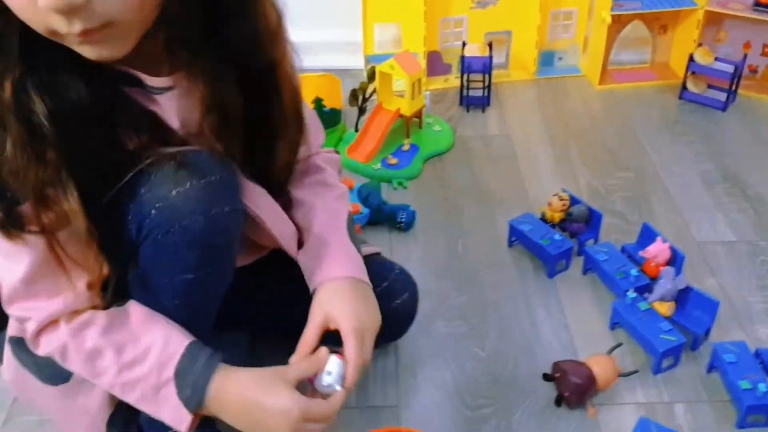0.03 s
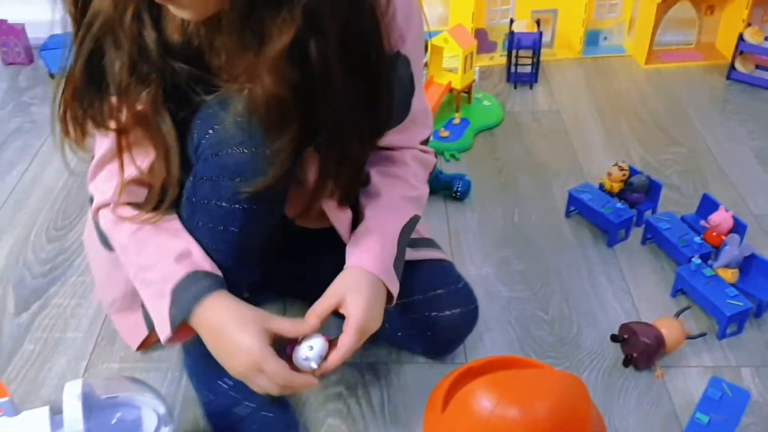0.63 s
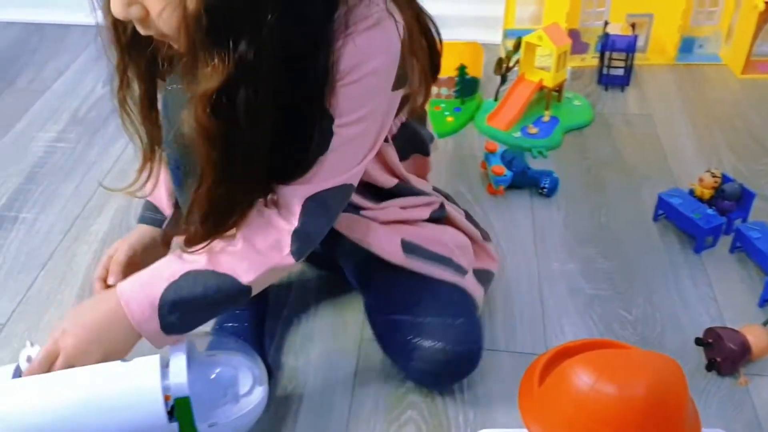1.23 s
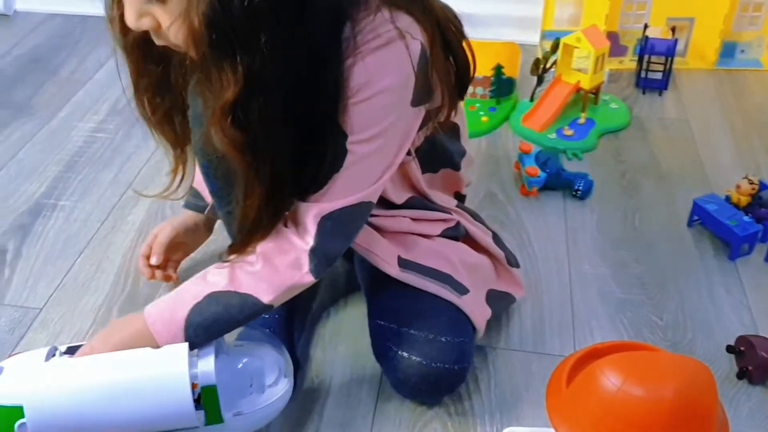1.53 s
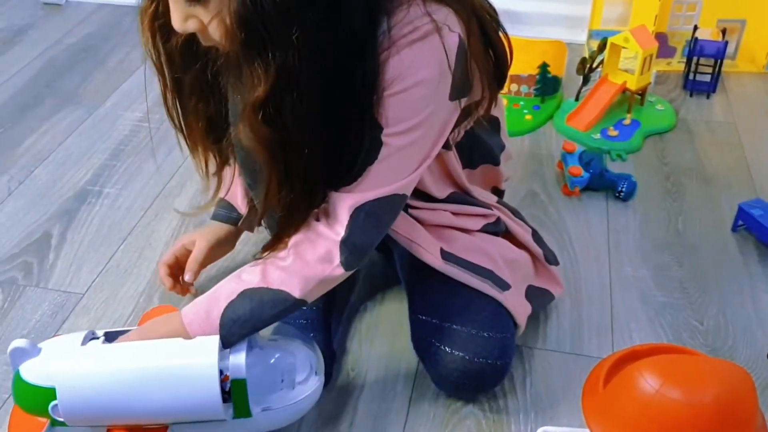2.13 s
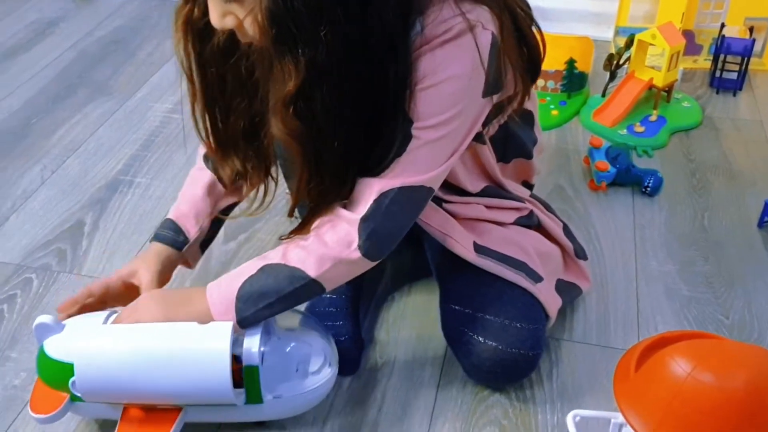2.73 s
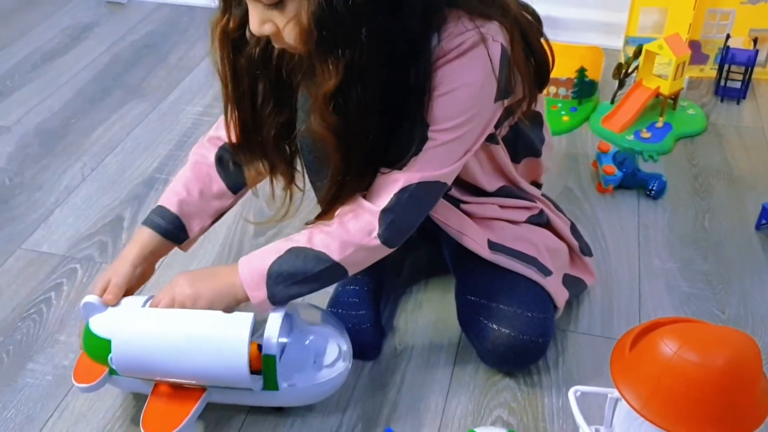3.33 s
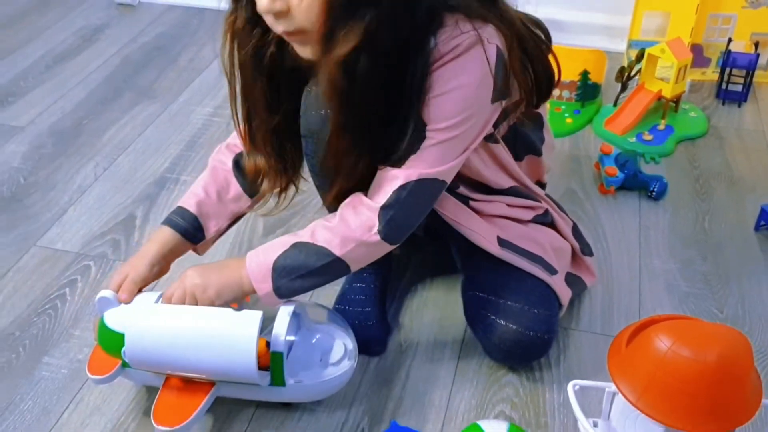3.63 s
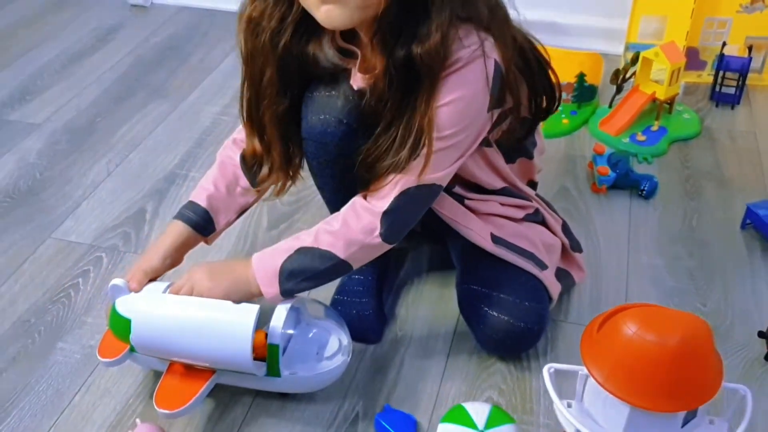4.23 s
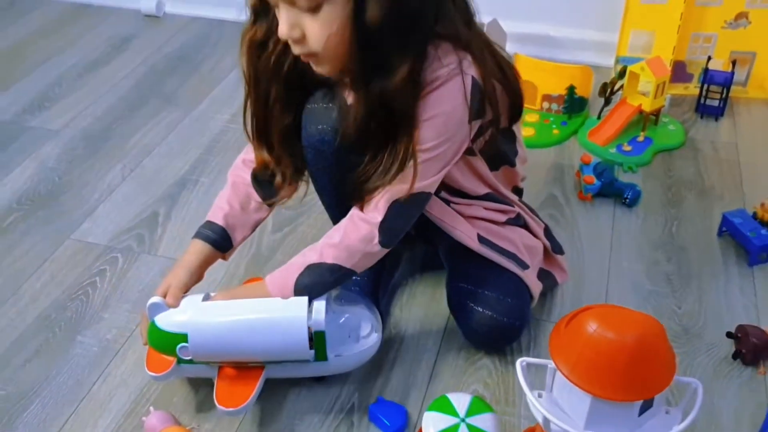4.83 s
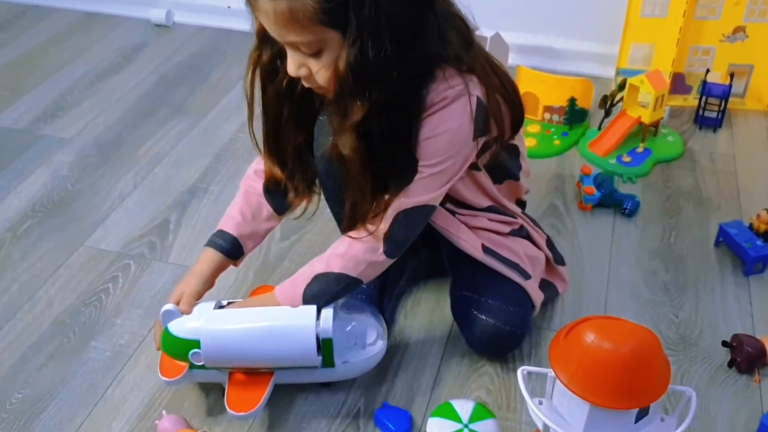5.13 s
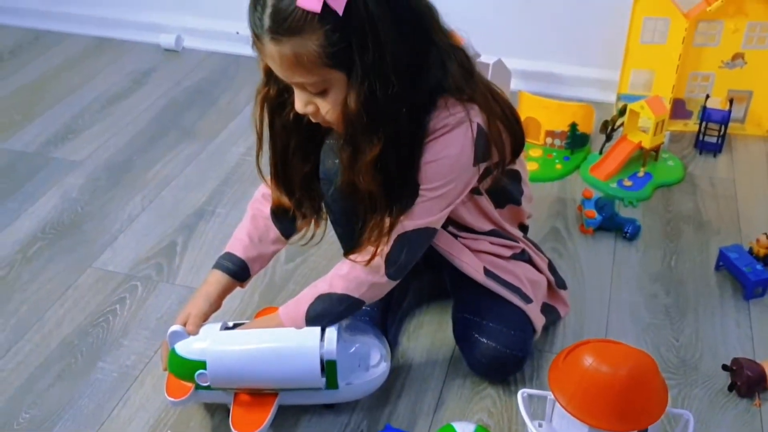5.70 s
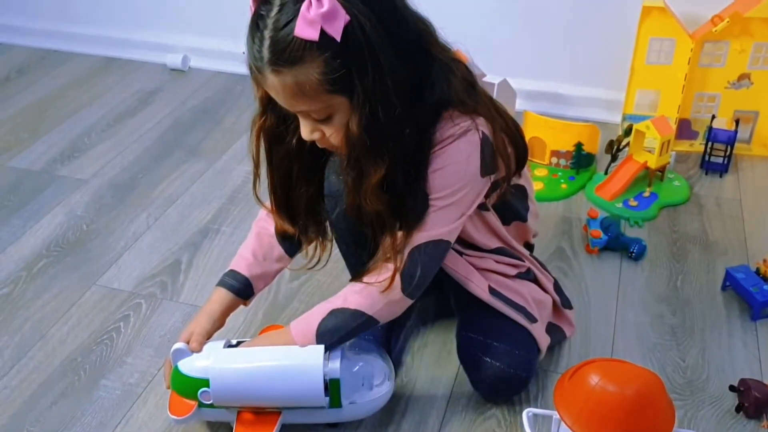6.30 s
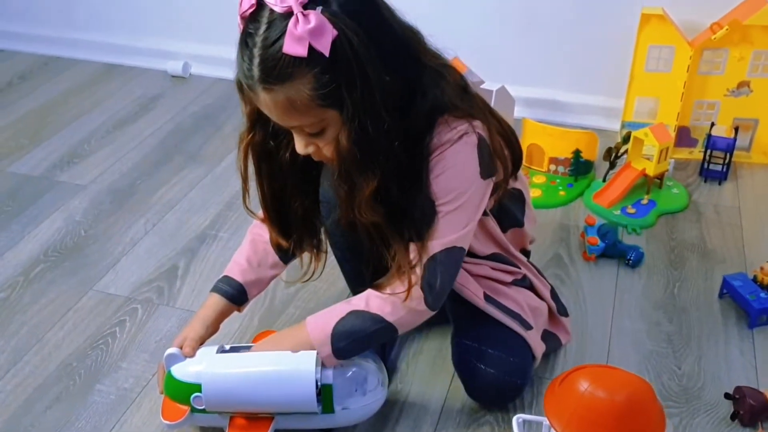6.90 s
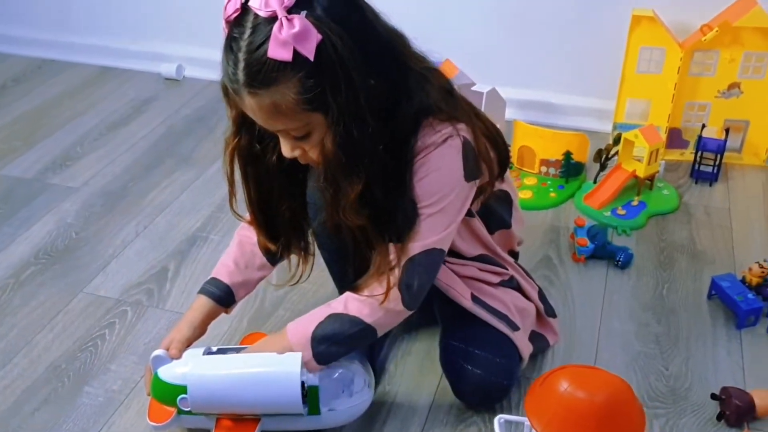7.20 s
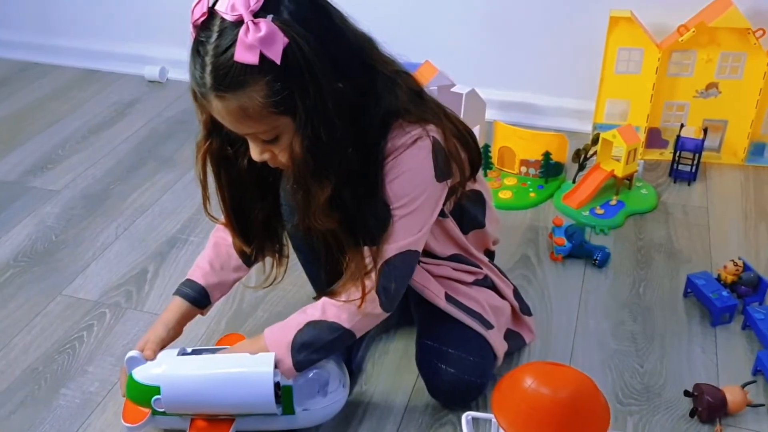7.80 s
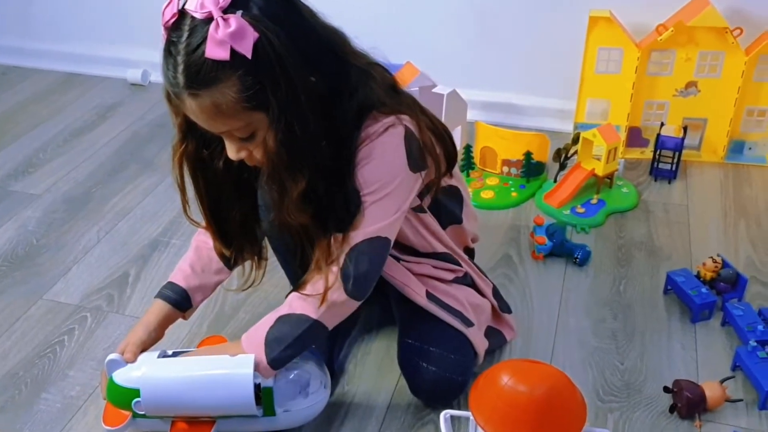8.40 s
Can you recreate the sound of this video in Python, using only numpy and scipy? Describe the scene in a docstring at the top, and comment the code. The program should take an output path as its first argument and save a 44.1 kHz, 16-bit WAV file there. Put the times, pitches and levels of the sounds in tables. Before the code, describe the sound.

Faint clothing rustle opens in a quiet room, with a soft knock and scuff just before 1 second. At about 1.4 seconds a small plastic figure clacks several times against a hollow toy plane, and loose parts rattle at 1.7 and 2.1. From 2.3 to 4 seconds there are light taps, soft scrapes on the hard floor and very faint squeaks, then two dull low bumps. The loudest moment is a quick, sharp plastic clatter at 4.5 seconds, followed by a brief slide, a catch snapping at 4.8 and a strong rattling knock at 5.1. Single lighter taps follow. Parts click together again around 6.6 seconds, and small irregular clicks continue from 7.4 until the end at about 8.3. The toy sounds near and slightly left, with a short room echo over faint low background noise.

```python
"""A hard-floored playroom, where a child fits a small plastic figure into a hollow toy aeroplane.
The figure knocks on the hull, loose parts chatter and knock home, and a catch snaps: each impact
excites damped modes, and the room reverberates. The toy slides after each burst of blows, edges rasp
and joints squeak by stick-slip friction, and the floorboards boom. Clothes swish and rustle over dull
bumps, still air and a low hum that sinks to a faint trace early on."""
import sys
import numpy as np
from scipy import signal
from scipy.fft import rfft, irfft, next_fast_len
from scipy.io import wavfile

SR = 44100
rng = np.random.default_rng(int(sys.argv[2]) if len(sys.argv) > 2 else 0)


def inscribe(sig):
    """Save sig as 16-bit PCM at rate SR to the path in sys.argv[1].

    A 1-D sig is mono; a 2-D sig holds one channel per row.
    Samples are clipped to [-1, 1] before scaling.
    """
    pcm = np.round(np.clip(np.atleast_2d(sig).T, -1, 1) * 32767)
    wavfile.write(sys.argv[1], SR, pcm.astype(np.int16))


N = 372689
MIDDLING_DB = -40   # table level of a blow of middling strength

# figure against the hull: (time [s], relative level [dB], brightness [dB])
FIGURE_KNOCKS = [(0.851, -50.5, -16), (1.326, -35.5, -5.5), (1.362, -33.5, -12), (1.381, -26, -5),
                 (1.428, -27.5, -6.5), (2.509, -54.5, -7), (3.073, -56, -7.5), (3.347, -50.5, -10.5),
                 (3.471, -43, -4.5), (4.464, -26.5, -5), (4.473, -17, -5.5), (4.48, -18.5, -1.5),
                 (4.491, -23, -3.5), (4.522, -20, -2.5), (4.68, -44, -6), (4.772, -38.5, -6),
                 (4.928, -41.5, -7.5), (5.519, -38, -11.5), (6.068, -55.5, -13), (6.172, -43.5, -14.5),
                 (6.179, -42.5, -12)]
# loose parts knocking home: (time [s], relative level [dB], brightness [dB], chatter beforehand [s])
PART_KNOCKS = [(1.7164, -44.5, -2, 0), (1.724, -32.5, -8, 0.0049), (1.736, -34.5, -11.5, 0),
               (1.77, -39, -16, 0), (2.073, -38.5, -13, 0.059), (5.118, -23, -8, 0.085),
               (5.156, -27.5, -10, 0), (6.542, -35.5, -11.5, 0.051), (6.664, -37.5, -13, 0.0055),
               (6.706, -32.5, -10, 0), (6.823, -53, -7, 0.012), (7.094, -45, -20, 0), (7.457, -48, 0, 0),
               (7.487, -38.5, -8, 0), (7.6, -42.5, -8.5, 0.0011), (7.659, -55, 7.5, 0),
               (7.835, -45, -16.5, 0.0014), (7.907, -48, -10.5, 0.00053), (7.965, -48, -16, 0),
               (8.251, -47.5, -17, 0.039), (8.292, -47, -14.5, 0)]
# modes of the hollow hull: (frequency [Hz], relative level [dB], t60 [s])
HULL_MODES = [(402.6, -5.5, 0.07), (473, -9, 0.15), (599, 1, 0.05), (795, 1, 0.062), (866, 2, 0.041),
              (1048, 1, 0.051), (1195, -6, 0.085), (1353, 4.5, 0.055), (1440, -9.5, 0.0401),
              (2014, 4, 0.027), (2205, -2.5, 0.031), (2600, -3, .02), (3922, -9.5, 0.019),
              (5400, -12.5, 0.013), (6870, -14, 0.038)]


def figure_knocks(spots):
    """Impact excitation: the figure strikes the hull, which rings in its normal modes."""
    return blows(FIGURE_KNOCKS, HULL_MODES, spots,
                 body_db=-1, crack_db=9.5, crack_t60=.03, top_hz=18500, gain_db=-5.5)


def loose_parts(spots):
    """Clearance rattle: a part with play in its seat touches lightly twice before it knocks home."""
    # modes of a loose part: (frequency [Hz], relative level [dB], t60 [s])
    part_modes = [(948, 2, 0.058), (1700, -12, 0.038), (1925, -0.5, 0.049), (2784, 0.5, 0.051),
                  (2750, 2, 0.053), (2886, -4, 0.035)]
    contacts = [row[:3] for row in PART_KNOCKS]
    for s, db, bright_db, chatter_s in PART_KNOCKS:
        if chatter_s > 0:
            touch_db = -54.5 + .66 * (db - MIDDLING_DB)
            contacts.append((s - chatter_s, touch_db, bright_db - 1))
            contacts.append((s - .52 * chatter_s, touch_db + 4, bright_db - 1))
    return blows(contacts, HULL_MODES + part_modes, spots,
                 body_db=-2, crack_db=12.5, crack_t60=.015, top_hz=17500, gain_db=-6.5)


def catch_snap(spots):
    """Impulse response: a catch snaps home, exciting its own modes and those of the hull."""
    # the snap: (time [s], relative level [dB], brightness [dB])
    snaps = [(4.798, -34, -1.5)]
    # modes of the catch: (frequency [Hz], relative level [dB], t60 [s])
    catch_modes = [(1922, 14, 0.027), (3750, 0.5, 0.031), (6100, 0, 0.011), (6900, -4, 0.031)]
    return blows(snaps, HULL_MODES + catch_modes, spots,
                 body_db=-6.5, crack_db=15, crack_t60=.034, top_hz=18000, gain_db=-.5)


def blows(contacts, modes, spots, body_db, crack_db, crack_t60, top_hz, gain_db):
    """Modal superposition: each contact is a noisy crack plus a sum of damped sinusoids."""
    # spectrum of the contact itself: (frequency [Hz], relative density [dB])
    crack_spectrum = [(150, -23), (280, -11), (400, 1.5), (900, 4), (2200, 6.5), (3300, -10.5), (6000, -13),
                      (10000, -24.5), (13000, -18), (15500, -35.5)]
    out, t = np.zeros((2, N + SR)), np.arange(SR // 8) / SR
    hz, mode_db, t60 = np.array(modes, float).T[:, :, None]
    attack = t < .011
    for k, (s, level_db, bright_db) in enumerate(contacts):
        strength = from_db(mode_db + 2 * rng.standard_normal(hz.shape)) * rng.choice([-1, 1], hz.shape)
        grip = 1 + .02 * rng.standard_normal(hz.shape)   # the fingers detune the shell a little
        ring = np.sum(strength * from_db(-60 * t / t60) * np.sin(2 * np.pi * hz * grip * t), axis=0)
        crack_noise = coloured(rng.standard_normal(len(t)), crack_spectrum)
        hit = ring + from_db(crack_db - 60 * t / crack_t60) * crack_noise
        # a lighter touch is duller and hollower
        reach_hz = max(top_hz * from_db(.11 * level_db), 5000)
        hollow_db = body_db - .3176 * (level_db - MIDDLING_DB)
        zones = [band(hit, *edges, order=3) for edges in [(350, 900), (900, 3300), (3300, reach_hz)]]
        hit = sum(from_db(zone_db) * zone / np.std(zone[attack])
                  for zone, zone_db in zip(zones, (hollow_db, 0, bright_db)))
        hit, lead = grazed(hit, graze_db=-19, lead_s=.003)
        sound = heard_from(hit, spots[k % len(spots)])
        start = round(s * SR) - lead
        out[:, start:start + sound.shape[1]] += from_db(gain_db + level_db) * sound
    return out[:, :N]


def grazed(hit, graze_db, lead_s):
    """Double contact: an edge grazes just before the blow; gives the sound and its lead in samples."""
    lead = int(lead_s * rng.uniform(.32, 1.5) * SR) + 1
    graze = from_db(graze_db + 1.2 * rng.standard_normal()) * np.pad(hit, (0, lead))
    return graze + np.pad(hit, (lead, 0)), lead


def scuffs():
    """Sliding friction: toy and knees rub over the floor, and the toy slides on after each burst."""
    # strokes on the floor: (centre time [s], duration [s], relative level [dB])
    strokes = [(.88, 0.045, -47), (2.35, 0.3, -54.5), (2.78, 0.15, -49), (3.06, 0.095, -50),
               (3.355, 0.15, -48.5), (4.0, 0.67, -59.5), (4.72, 0.48, -48)]
    # floor friction: (frequency [Hz], relative density [dB])
    spectrum = [(150, -5.5), (300, -4), (450, 5.5), (650, -3.5), (1300, -1.5), (2200, -12.5), (3300, -26.5),
                (7000, -30), (14000, -41)]
    pause_s, delay_s, slide_s = .15, .16, .33   # a gap longer than pause_s ends a burst
    knocks = sorted(FIGURE_KNOCKS + PART_KNOCKS)
    gaps = np.diff([row[0] for row in knocks], append=np.inf)
    slides = [(s + delay_s, slide_s, -63 + .4 * (db - MIDDLING_DB))
              for (s, db, *_), gap_s in zip(knocks, gaps) if gap_s > pause_s]
    return from_db(-11) * rubbing(strokes + slides, spectrum, slips_per_s=380, spread_db=6.5, hiss=.37)


def rasps():
    """Dry friction: hard edges catch and slip as they pass each other."""
    # strokes of edge on edge: (centre time [s], duration [s], relative level [dB])
    strokes = [(3.49, 0.047, -56), (4.87, 0.023, -62), (5.08, 0.034, -49.5), (7.68, 0.087, -56),
               (7.88, 0.093, -62)]
    # edge friction: (frequency [Hz], relative density [dB])
    spectrum = [(400, -7), (1000, -23), (1800, 5), (3000, -3), (5500, -1), (8000, -11), (14000, -21)]
    return from_db(-6) * rubbing(strokes, spectrum, slips_per_s=390, spread_db=3, hiss=.29)


def rubbing(strokes, spectrum, slips_per_s, spread_db, hiss):
    """Stick-slip motion: plastic advances in tiny uneven jerks, a random impulse train over noise."""
    sizes = from_db(spread_db * np.minimum(rng.exponential(1, N), 4)) * rng.choice([-1, 1], N)
    slips = rms_one(sizes * (rng.random(N) < slips_per_s / SR))
    return swells(strokes) * coloured(slips + hiss * rng.standard_normal(N), spectrum)


def squeaks(width_hz):
    """Friction-induced vibration: joints squeak and the figure groans in narrow, unsteady bands."""
    # sticking contacts: (centre time [s], duration [s], relative level [dB], frequency [Hz])
    strokes = [(2.29, .17, -57.5, 600), (2.782, 0.063, -72.5, 3570), (3.38, 0.12, -73.5, 3580),
               (4.05, .25, -65, 480), (5.482, 0.016, -54.5, 6400)]
    out = np.zeros(N)
    for s, length, db, hz in strokes:
        tone = rms_one(band(rng.standard_normal(N), hz - width_hz / 2, hz + width_hz / 2))
        out += swells([(s, length, db)]) * tone
    return from_db(-3.5) * out


def floorboards():
    """Structure-borne sound: a landing knee and the figure's knocks excite the modes of the boards."""
    # modes of the boards: (frequency [Hz], relative level [dB], t60 [s])
    modes = [(176, -5.5, 0.13), (217, -3.5, 0.071), (265, -1.5, 0.064), (340, -2, 0.091), (586, -4, .07)]
    knee = (.849, -53)   # (time [s], relative level [dB])
    out, t = np.zeros(N), np.arange(SR // 5) / SR
    for s, level_db in [knee] + [(s, db - 27.5) for s, db, _ in FIGURE_KNOCKS]:
        boom = sum(from_db(db - 60 * t / t60) * np.sin(2 * np.pi * hz * t) * rng.choice([-1, 1])
                   for hz, db, t60 in modes)
        start = round(s * SR)
        out[start:start + len(t)] += from_db(level_db) * boom
    return out


def swishes():
    """Fibre friction: brushing sleeves and hair radiate short swells of treble noise."""
    # brushing strokes: (centre time [s], duration [s], level [dB])
    strokes = [(.28, 0.35, -73.5), (.78, 0.24, -65.5), (1.22, 0.17, -67), (2.47, 0.14, -74),
               (2.76, .2, -71.5), (3.3, 0.6, -78), (4.15, .7, -76), (6.06, 0.15, -69)]
    # brushing fibres: (frequency [Hz], relative density [dB])
    spectrum = [(1000, -33.5), (3000, -7), (4500, -4), (7000, 5.5), (8500, -5.5), (11000, 1.5),
                (15000, -12)]
    return swells(strokes) * coloured(diffuse(N), spectrum)


def rustle():
    """Cloth friction: sliding folds make midrange noise that follows the child's movement."""
    # envelope of the rustle: (time [s], level [dB])
    levels = [(0, -65), (0.801, -59), (1.7, -72.5), (3.2, -64), (3.6, -62), (4.3, -64), (5.4, -63),
              (6.42, -74), (6.95, -69), (8.45, -70.5)]
    # sliding cloth: (frequency [Hz], relative density [dB])
    spectrum = [(200, -16), (350, -10), (600, -1.5), (820, 2.5), (1050, -2.5), (1600, -20.5), (3000, -32.5),
                (8000, -43)]
    return envelope(levels) * coloured(diffuse(N), spectrum)


def bumps():
    """Amplitude modulation: brief swells of bass noise are heard as dull bumps."""
    # bumps: (centre time [s], duration [s], relative level [dB])
    strokes = [(4.135, 0.05, -46), (4.24, 0.1, -50), (4.95, 1, -61), (7.2, 0.21, -58.5),
               (7.97, 0.089, -62.5)]
    # bass noise: (frequency [Hz], relative density [dB])
    spectrum = [(18, -9), (39, -5.5), (60, -8), (120, -14), (250, -32.5), (600, -68)]
    return swells(strokes) * coloured(diffuse(N), spectrum)


def hum(hz, waver):
    """Beating: a low tone wavers as it interferes with a narrow band of noise around it."""
    # envelope of the hum: (time [s], relative level [dB])
    levels = [(0, -57), (.4, -68), (1.1, -68), (2.2, -53), (2.4, -72)]
    tone = np.sqrt(2) * np.sin(2 * np.pi * hz * np.arange(N) / SR)
    unsteady = rms_one(band(rng.standard_normal(N), hz - 4, hz + 4))
    return envelope(levels) * (tone + waver * unsteady)


def room_air(level_db):
    """Ambient noise: still air carries a steady, diffuse background, strongest in the bass."""
    # room air: (frequency [Hz], relative density [dB])
    spectrum = [(18, -22), (45, -0.5), (80, -9), (130, 0), (180, -7), (230, 1), (320, -21), (600, -16),
                (900, -8), (1500, -19), (3000, -34.5), (5500, -38.5), (7100, -36.5), (8500, -44),
                (14000, -32)]
    return from_db(level_db) * coloured(diffuse(N), spectrum)


def room_paths(wet_db, build_s, echo_db, wet_left_db, direct_left_db, lag_s):
    """Room impulse response: direct sound from the left, early echoes, a tail whose treble dies first."""
    # reverberation time: (frequency [Hz], t60 [s])
    decay_times = [(200, 0.55), (600, 0.44), (1500, 0.35), (4000, 0.33), (8000, 0.31), (14000, .27)]
    t = np.arange(SR * 3 // 5) / SR
    edges, tail = np.geomspace(100, 18000, 12), 0
    noises = diffuse(len(t)), diffuse(len(t))
    for k, (low, high) in enumerate(zip(edges, edges[1:])):
        t60 = at_hz(decay_times, np.sqrt(low * high))
        tail = tail + band(noises[k % 2], low, high) * from_db(-60 * t / t60)
    paths = from_db(wet_db) * rms_one(tail * (1 - np.exp(-t / build_s))) / np.sqrt(len(t))
    for delay in rng.uniform(.0014, .022, size=5):
        slant = rng.uniform(-.0003, .00026)   # each echo comes from its own side
        arrivals = [round(delay * SR), round((delay + slant) * SR)]
        paths[[0, 1], arrivals] += from_db(echo_db) * rng.choice([-1, 1])
    paths *= from_db([[wet_left_db / 2], [-wet_left_db / 2]])
    paths[[0, 1], [0, round(lag_s * SR)]] += from_db([direct_left_db / 2, -direct_left_db / 2])
    return paths


def heard_from(x, paths):
    """Convolution with one spot's impulse response places a sound in the room."""
    return signal.fftconvolve(x[None], paths, axes=1)


def diffuse(count):
    """Diffuse field: white noise from all sides, coherent in the bass and hardly so in the treble."""
    # likeness of left and right: (frequency [Hz], correlation [1])
    coherence = [(100, 0.78), (300, 0.87), (600, 0.42), (1200, 0), (3000, 0), (14000, 0.31)]
    size = next_fast_len(count)
    mid, side = rfft(rng.standard_normal((2, size)))
    alike = np.clip(at_hz(coherence, np.fft.rfftfreq(size, 1 / SR) + 1), -1, 1)
    left_right = np.sqrt((1 + alike) / 2) * mid + np.sqrt((1 - alike) / 2) * side * [[1], [-1]]
    return irfft(left_right, size)[:, :count]


def swells(strokes):
    """Incoherent addition: the strokes' Gaussian power curves sum; gives the amplitude."""
    t, power = np.arange(0, N, 32) / SR, 0
    for middle, length, level_db in strokes:
        bell = np.exp(-np.minimum((2 * (t - middle) / length) ** 2, 60))
        power = power + from_db(level_db) ** 2 * bell
    return np.interp(np.arange(N) / SR, t, np.sqrt(power))


def envelope(levels):
    """Amplitude interpolated in decibels between (time [s], level [dB]) points."""
    return from_db(np.interp(np.arange(N) / SR, *np.transpose(levels)))


def coloured(x, spectrum):
    """Spectral shaping of a noise, at unit rms."""
    size = next_fast_len(x.shape[-1])
    hz = np.fft.rfftfreq(size, 1 / SR) + 1
    shaped = irfft(rfft(x, size) * from_db(at_hz(spectrum, hz)), size)
    return rms_one(shaped[..., :x.shape[-1]])


def band(x, low_hz, high_hz, order=2):
    """Causal band-pass filter."""
    sections = signal.butter(order, [low_hz, min(high_hz, .47 * SR)], "band", fs=SR, output="sos")
    return signal.sosfilt(sections, x)


def at_hz(points, hz):
    """Interpolation on a log-frequency axis."""
    points = np.array(points)
    return np.interp(np.log(hz), np.log(points[:, 0]), points[:, 1])


def rms_one(x):
    """Normalisation to unit rms."""
    return x / np.sqrt(np.mean(x ** 2) + 1e-20)


def from_db(db):
    """Decibels to amplitude ratio."""
    return 10 ** (np.asarray(db) / 20)


def scene():
    """Linear superposition: toy, floor, clothes and background add at left and right."""
    # every part of the toy radiates its own way into the room
    spots = [room_paths(wet_db=1.5, build_s=.0027, echo_db=-8, wet_left_db=1.66,
                        direct_left_db=5.5, lag_s=.00012) for _ in range(10)]
    toy = figure_knocks(spots) + loose_parts(spots) + catch_snap(spots)
    friction = heard_from(scuffs() + rasps() + squeaks(width_hz=104), spots[-1])[:, :N]
    boards = heard_from(floorboards(), spots[0])[:, :N]
    clothes = swishes() + rustle()
    bass = (bumps() + hum(hz=63, waver=.3)) * from_db([[-3], [2]])   # stronger on the right
    return toy + friction + boards + clothes + bass + room_air(level_db=-63)


def record(dry):
    """Band limiting: a steep elliptic low-pass removes the treble above 15.3 kHz."""
    return signal.sosfilt(signal.ellip(10, .1, 80, 15300, fs=SR, output="sos"), dry)


dry = scene()
out = record(dry)
inscribe(out)
```